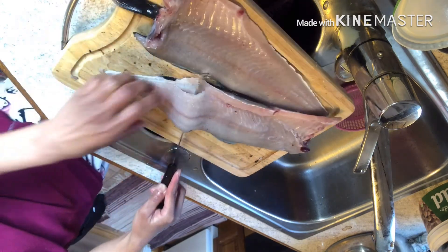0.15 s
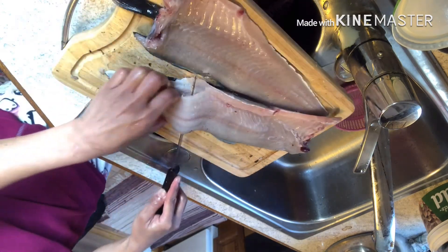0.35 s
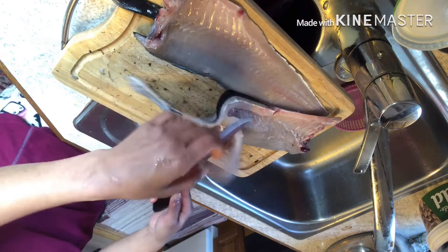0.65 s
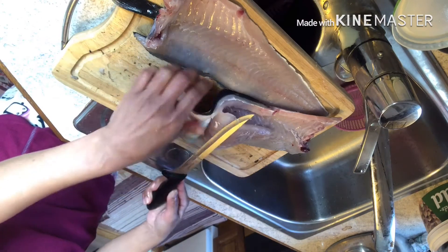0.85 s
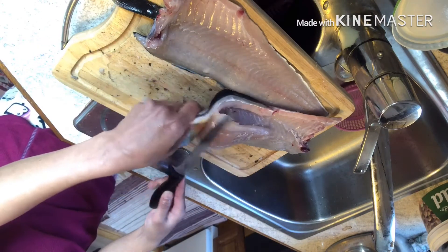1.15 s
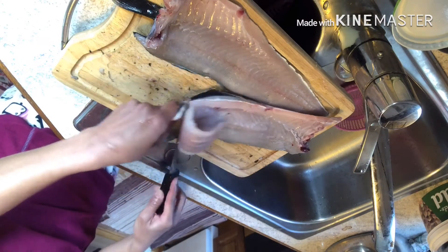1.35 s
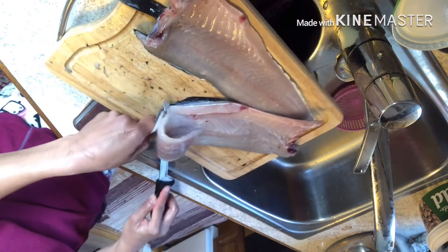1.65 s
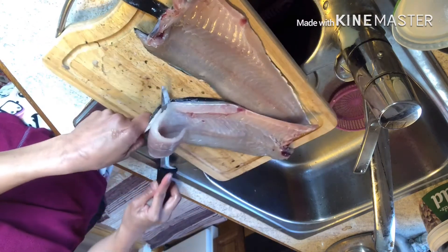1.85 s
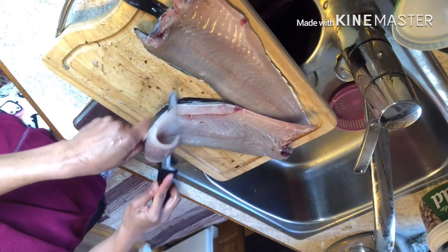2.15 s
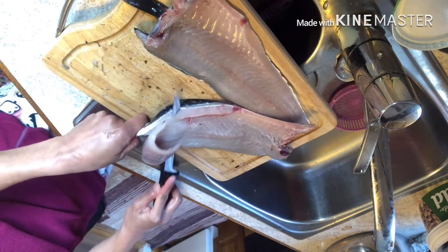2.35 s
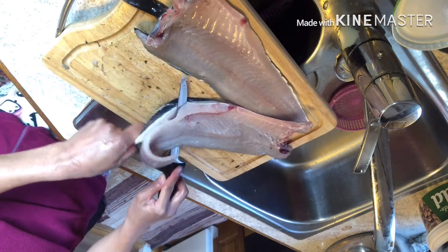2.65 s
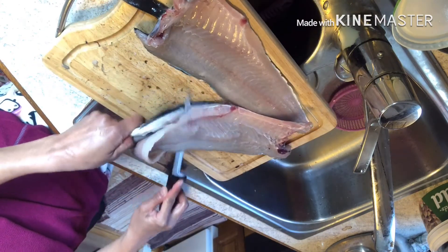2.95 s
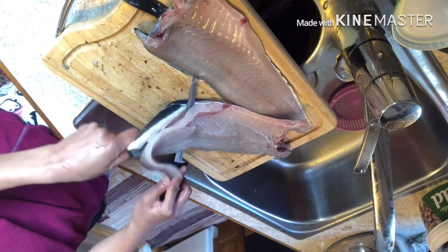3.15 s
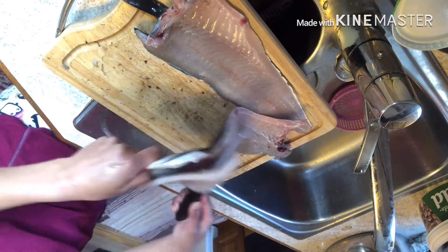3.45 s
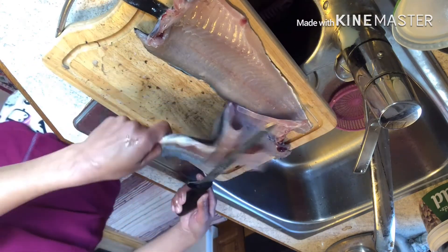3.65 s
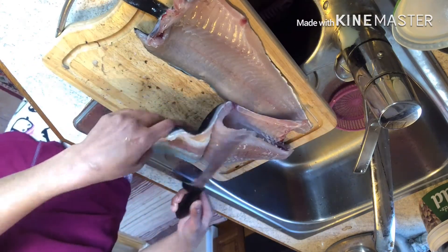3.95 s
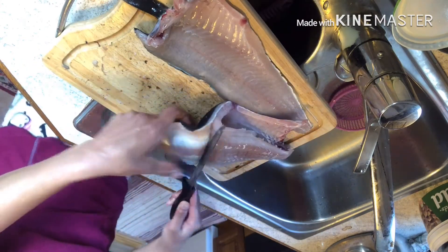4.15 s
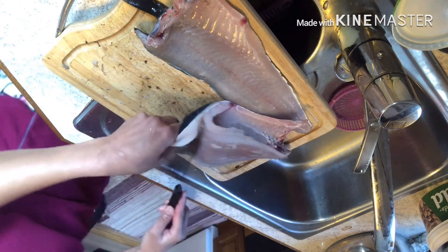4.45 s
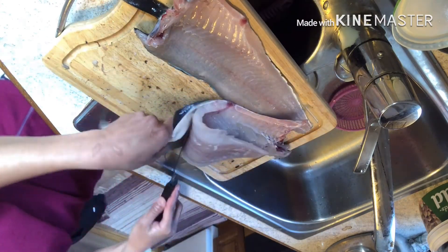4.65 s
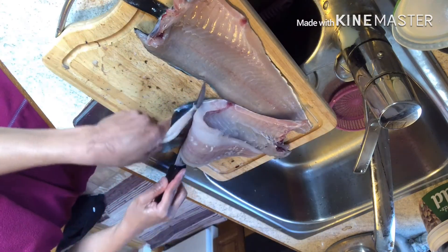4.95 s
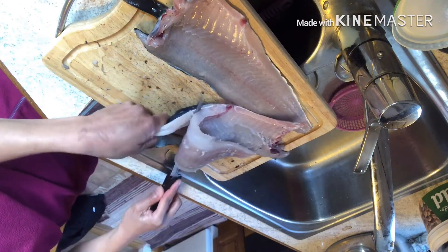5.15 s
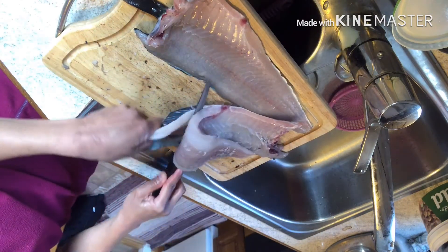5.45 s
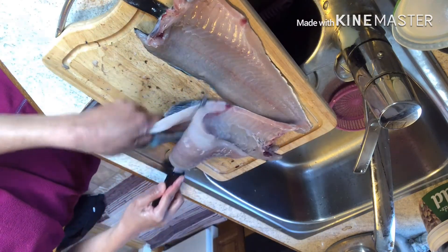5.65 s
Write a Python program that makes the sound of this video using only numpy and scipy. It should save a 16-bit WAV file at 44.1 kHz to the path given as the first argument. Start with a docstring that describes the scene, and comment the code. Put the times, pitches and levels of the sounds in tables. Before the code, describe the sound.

A knife rasps between skin and flesh of a raw fish fillet on a wooden board, with wet smacks, sharp snaps and hollow knocks.

```python
"""A raw fish fillet is skinned on a wooden board across a steel kitchen sink, in a small, quiet kitchen.
At first the knife rasps softly to and fro; near one second the blade judders briefly on the wood.
Then the strokes grow louder, and where the blade catches it snaps free and the board knocks.
After a calmer spell past three seconds, the strongest snaps and rasps come near the end.
Filtered noise makes rasp, hiss and snaps, fading sine tones make the board ring; wet smacks run throughout."""
import sys
import numpy as np
from scipy import signal
from scipy.fft import rfft, irfft
from scipy.io import wavfile

SR = 44100
rng = np.random.default_rng(int(sys.argv[2]) if len(sys.argv) > 2 else 0)


def to_wav(s):
    """Save 16-bit WAV."""
    ch = np.atleast_2d(s).T  # columns
    pcm = np.round(np.clip(ch, -1, 1) * 32767)  # PCM
    wavfile.write(sys.argv[1], SR, pcm.astype(np.int16))


N = 255339   # length of the scene in samples
TIME = np.arange(N) / SR   # seconds since the scene began
AGE = np.arange(SR // 2) / SR   # seconds since one short sound began


def from_db(db):
    """Turn decibels into gain."""
    return 10 ** (np.asarray(db) / 20)


def rms_one(x, size=None):
    """Scale to an rms of 1, judged on the first `size` samples or on all."""
    return x / np.sqrt(np.mean(x[:size] ** 2) + 1e-20)


def add(out, start_s, sound):
    """Mix a sound in at a time, cut off where the scene ends."""
    start = max(0, round(start_s * SR))
    out[start:start + len(sound)] += sound[:max(0, N - start)]


def at_hz(points, hz):
    """Read a spectrum between its points, on a log-frequency axis."""
    freq, db = np.transpose(points)
    return np.interp(np.log(hz + 1e-6), np.log(freq), db)


def coloured(x, *spectra, peaks=()):
    """Shape a steady noise by spectra and resonance peaks, then scale to an rms of 1."""
    hz = np.fft.rfftfreq(len(x), 1 / SR)
    db = sum(at_hz(points, hz) for points in spectra)
    for centre_hz, width_hz, lift_db in peaks:
        db = db + lift_db / (1 + (2 * (hz - centre_hz) / width_hz) ** 2)
    return rms_one(irfft(rfft(x) * from_db(db), len(x)))


def resonate(x, hz, width_hz):
    """Ring one resonance, a two-pole filter with gain 1 at its peak."""
    r = np.exp(-np.pi * width_hz / SR)
    feedback = [1, -2 * r * np.cos(2 * np.pi * hz / SR), r * r]
    return (1 - r * r) / 2 * signal.lfilter([1, 0, -1], feedback, x)


def drift(rate):
    """Wander slowly at random: normal values of spread 1, `rate` per second, joined by lines."""
    knots = rng.standard_normal(4096)
    return np.interp(TIME * rate, np.arange(len(knots)), knots)


def grains(per_s, spread_db):
    """Scatter tiny random contacts of very unequal size; rms 1."""
    size_db = spread_db * np.minimum(rng.exponential(1, N), 5)
    sizes = from_db(size_db) * rng.choice([-1, 1], N)
    return rms_one(sizes * (rng.random(N) < per_s / SR))


# colour of the quiet background: pitch_hz, relative level_db
ROOM_TONE_COLOUR = [(15, -41), (25, -8), (137, -2.5), (439, -7.5), (575, -7.5), (641, -8), (887, -12.5),
                    (962, -12), (1610, -15), (1940, -17.5), (3820, -18.5), (10100, -24), (14800, -24.5),
                    (16000, -22.5)]
ROOM_TONE_DB = -64.5


def room_tone():
    """Steady coloured noise stands for the quiet kitchen."""
    return from_db(ROOM_TONE_DB) * coloured(rng.standard_normal(N), ROOM_TONE_COLOUR)


def kitchen(x, gap_s, low_t60_s, treble_t60_s):
    """Near walls send back a blur of reflections, made of fading noise; the treble dies sooner."""
    noise = rng.standard_normal(len(AGE))
    low = signal.sosfilt(signal.butter(1, 4000, fs=SR, output="sos"), noise)
    treble = noise - low
    echo = low * from_db(-60 * AGE / low_t60_s) + treble * from_db(-60 * AGE / treble_t60_s)
    echo *= 1 - np.exp(-(AGE / gap_s) ** 2)   # the reflections arrive a little late
    return signal.fftconvolve(x, echo / np.sqrt(np.sum(echo ** 2)))[:N]


# the blade sticks and slips on the wood:
# start_s, length_s, relative level_db, brightness_db_per_octave
JUDDERS = [(0.9955, 0.04, -46, 3.5), (1.017, 0.041, -41, -12), (1.088, 0.051, -49.5, 0),
           (1.117, 0.024, -52.5, 3.0)]
# resonances that a judder sets singing: pitch_hz, width_hz, relative level_db
SINGING_RESONANCES = [(476, 2.7, -3), (654, 180, -12), (1272, 17, -17), (1624, 44, -10.5), (2650, 350, -24),
                      (3480, 320, -24)]


def judders(level_db):
    """Irregular slips, made of noise, swell and fade in a few resonances."""
    out = np.zeros(N)
    lowest_hz = SINGING_RESONANCES[0][0]
    for start_s, length_s, db, brightness in JUDDERS:
        swell = np.sin(np.pi * np.minimum(AGE / length_s, 1) ** 0.82)
        for hz, width_hz, line_db in SINGING_RESONANCES:
            slips = rng.standard_normal(2 * len(AGE))
            tone = resonate(slips, hz, width_hz)[len(AGE):]   # skip the filter's build-up
            gain = from_db(db + level_db + line_db + brightness * np.log2(hz / lowest_hz))
            add(out, start_s, gain * rms_one(tone * swell, size=int(length_s * SR)))
    return out


# blows on the board: start_s, relative level_db, depth_db (up to 140 Hz),
# hardness_db (440 to 530 Hz), edge_db (from 1120 Hz up)
KNOCKS = [(0.83, -66.5, 7.5, 6, -1), (1.849, -53.5, -4, 3, -35), (2.077, -49.5, -7, -6, -32),
          (2.207, -45, -8, -11, -30), (2.244, -60, -14, 9.5, -6), (2.267, -50, -9, 8.5, -14),
          (2.304, -53, 1, 4, 6), (2.62, -42.5, -5.5, -1.5, 3.5), (2.656, -36, -12, 0.5, -4),
          (2.699, -45, 0, 3.5, 6), (3.08, -46.5, -2, 4.5, 10), (3.108, -50, 7, 13.5, 5),
          (3.137, -53, 9, 15, 10), (3.169, -54.5, 0, 13.5, 16), (3.721, -63.5, 3, -1, 5),
          (3.806, -52, 5.5, 3, 8), (3.991, -53.5, -0.5, 0.5, -15), (4.243, -68, 15.5, 5, 14),
          (4.497, -44, -8.5, 4, -46), (4.714, -65, 5, -14, 4), (5.389, -36, -5.5, 4, -2.5),
          (5.455, -40, -1, 8.5, -2), (5.562, -36, -8.5, -10.5, -9.5), (5.75, -36, -11.5, 4, -8)]
# ways the board rings on the sink: pitch_hz, relative level_db, t60_s (time to fade by 60 dB)
BOARD_MODES = [(69, -14, 0.43), (104.6, -5, 0.41), (136.2, 6, 0.26), (205.3, -9, 0.4), (232.4, 11, 0.093),
               (276.5, 4, 0.16), (310, 2, 0.12), (381, -2, 0.092), (452.6, 8, 0.13), (487, -5, 0.15),
               (646, -5, 0.23), (686.3, -4, 0.15), (759, -8, 0.16), (1055, -16.5, 0.25), (1278, 1.5, 0.051),
               (1561, 8, 0.039), (1670, -7, 0.085), (1840, -19, 0.078), (2210, -14, 0.15),
               (2380, -28, 0.024), (3000, -18, 0.1)]
# colour of the dull thud of sink and counter: pitch_hz, relative level_db
THUD_COLOUR = [(35, -31), (70, 8.5), (130, 8), (240, 10.5), (430, 3), (560, -26), (720, 7), (950, -17),
               (1450, -13), (2200, -45), (4000, -31), (9000, -40)]


def knocks(modes_db, thud_db, thud_s, cushion_s, build_cycles):
    """A blow, cushioned by the fillet, rings the board's modes over a dull thud of sink and counter."""
    out = np.zeros(N)
    hz, mode_db, t60_s = np.transpose(BOARD_MODES)[:, :, None]
    push = 1 - np.exp(-(AGE / cushion_s) ** 2)
    build = 1 - np.exp(-(AGE * hz / build_cycles) ** 2)   # low modes take longer to get going
    for start_s, db, depth, hardness, edge in KNOCKS:
        contact = [(140, depth), (210, 0.004), (330, 0), (440, hardness), (530, hardness), (1120, edge)]
        phase = rng.uniform(0, 2 * np.pi, hz.shape)   # each blow lands on another spot
        fading = from_db(mode_db + at_hz(contact, hz) - 60 * AGE / t60_s)
        modes = build * fading * np.sin(2 * np.pi * hz * AGE + phase)
        strength = np.sqrt(np.mean(modes ** 2, axis=1).sum())   # from the energy of all modes
        ring = rms_one(push * modes.sum(axis=0))
        thud_noise = coloured(rng.standard_normal(len(AGE)), THUD_COLOUR, contact)
        thud = rms_one(push * thud_noise * np.exp(-AGE / thud_s))
        blow = from_db(modes_db) * ring + from_db(thud_db) * thud
        add(out, start_s - .001, from_db(db) * strength * blow)   # starts 1 ms before its table time
    return out


# resonances of the blade: pitch_hz, width_hz, lift_db
BLADE_RESONANCES = [(1536, 83, 8.5), (1847, 43, 6.5), (2456, 55, 7.5), (3100, 140, 6), (3516, 140, 1.5),
                    (3630, 140, 5), (4980, 480, 5.5), (5530, 97, 1.5), (6230, 510, 0.5), (6120, 65, 2.5),
                    (7790, 210, 5), (8300, 280, -3.5), (11400, 160, 9), (15000, 460, 10.5)]


def on_blade(x, colour):
    """Colour a noise and let the blade's resonances stand out of it."""
    return coloured(x, colour, peaks=BLADE_RESONANCES)


# wet skin peels off with a small bright smack: start_s, relative level_db
SMACKS = [(0.334, -60), (0.597, -46.5), (0.662, -48), (0.686, -52), (0.6935, -46), (1.078, -54.5),
          (1.117, -48), (1.293, -58), (1.978, -51), (3.309, -45), (3.447, -42), (3.678, -54),
          (4.459, -59.5), (4.493, -48.5), (4.516, -45.5), (4.668, -57), (5.294, -51), (5.354, -39)]


def smacks():
    """Wet smacks are snaps that share one thin, bright colour and a quick start."""
    bite_db, sparkle_db, rise_s = -8.5, 6.5, 0.00047
    return [(start_s, db, bite_db, sparkle_db, rise_s) for start_s, db in SMACKS]


# the caught blade snaps free: start_s, relative level_db, bite_db (near 2.5 kHz),
# sparkle_db (near 13 kHz), rise_s
SNAPS = [(0.8267, -41, -4.5, -2, 0.0052), (1.741, -49.5, 14, -6, 0.0003), (1.841, -33, 1.5, 2, 0.00091),
         (2.2005, -39, 16, 7, 0.002), (2.2405, -27.5, 1, 5.5, 0.00066), (2.264, -29, -1, 0.5, 0.00068),
         (2.301, -33.5, 1, 2, 0.0003), (2.6184, -35.5, 4.5, 3.5, 0.00063), (2.654, -30, 5, 1, 0.00058),
         (2.697, -25.5, 8.5, 8, 0.00019), (2.76, -45, 38, -8, 0.0002), (3.075, -32.5, 0.5, -7, 0.0022),
         (3.105, -28.5, 1.5, 0, 0.00046), (3.136, -33.5, 3, -12, 0.00086), (3.168, -34, -1, 5, 0.0012),
         (3.179, -33.5, 7, -8, 0.00016), (3.751, -42.5, -3, 6, 0.0012), (3.7724, -42.5, -11, -4, 0.003),
         (3.8053, -31.5, 8.5, 1, 0.0013), (4.712, -40.5, 24, -28, 0.00044),
         (5.063, -42.5, 13, -20, 0.00045), (5.08, -43, -3, -20, 0.0003), (5.102, -41, 11, -17, 0.00092),
         (5.2125, -38.5, 17, -17, 0.00027), (5.385, -23.5, 3.5, 2.5, 0.00049),
         (5.426, -26.5, 3, -5, 0.00019), (5.556, -38, 38, 2, 0.0016), (5.783, -23.5, 2.5, -15, 0.0021)]


def snaps(level_db, spike_db, crack_s, ring_s, ring_db):
    """Each snap or smack is noise fading as a spike, a crack of a few milliseconds and a short ring."""
    out = np.zeros(N)
    spike = from_db(spike_db) * np.exp(-AGE / 0.00033)
    decay = spike + np.exp(-AGE / crack_s) + from_db(ring_db) * np.exp(-AGE / ring_s)
    for start_s, db, bite, sparkle, rise_s in list(SNAPS) + smacks():
        colour = [(300, bite - 24), (1100, bite - 13), (2100, bite), (3200, bite), (5800, 1),
                  (8500, -0.3), (12500, sparkle), (15800, sparkle + 1), (18000, sparkle - 20)]
        crack = on_blade(rng.standard_normal(len(AGE)), colour) * decay
        crack *= 1 - np.exp(-(AGE / rise_s) ** 2)
        add(out, start_s, from_db(db + level_db) * rms_one(crack, size=220))   # judged on 5 ms
    return out


def squelch(x, wander_db):
    """Wet flesh shifts on the steel, so each region of the treble swells and sinks on its own."""
    out = x.copy()
    for hz in np.geomspace(1500, 15000, 13):
        out += (from_db(wander_db * drift(rate=32)) - 1) * resonate(x, hz, 0.21 * hz)
    return out


def stroke_gate(start_s, length_s):
    """A stroke sets in, holds for its length and dies away."""
    attack_s, release_s = 0.019, 0.028
    age = np.maximum(TIME - start_s, 0)
    attack = 1 - np.exp(-np.minimum(age / attack_s, 6) ** 2)
    return attack * np.exp(-np.clip((age - length_s) / release_s, 0, 20))


# strokes of knife and hand; each bends the blade anew, so that another resonance speaks:
# start_s, length_s, relative rasp_db, hiss_db and rumble_db, swell_db (from start to end),
# ring_hz, ring_lift_db, overtone_lift_db
STROKES = [(0.064, 0.11, -67.5, -81, -69, -13, 1560, 5, 4),
           (0.486, 0.14, -70.5, -64, -72.5, 17.5, 1410, 22, -2),
           (0.637, 0.06, -68.5, -57.5, -69, 2, 1544, 16.5, -6),
           (0.785, 0.12, -74, -65.5, -71, -6, 1600, 1, -10), (0.99, 0.08, -73, -87, -56.5, -4, 1600, 2, -6),
           (1.082, 0.12, -73, -67, -65, 6.5, 1650, 13, 2), (1.348, 0.25, -68.5, -75, -79, 6, 1510, 13, 4),
           (1.547, 0.27, -58.5, -68, -49, 6.5, 3250, 1, 4.5),
           (1.798, 0.12, -51, -57, -51.5, -13, 2750, 6, 2), (1.964, 0.094, -60, -61, -60, 16.5, 2650, 6, 7),
           (2.142, 0.072, -55.5, -54, -58, 20, 2340, 16.5, 2),
           (2.216, 0.11, -55, -52.5, -49.5, -15, 2150, 8.5, -1.5),
           (2.338, 0.16, -56.5, -63, -57, 8.5, 2290, 12, 8),
           (2.56, 0.14, -55, -54.5, -51, 15, 2060, 13, 11.5),
           (2.793, 0.2, -55.5, -58, -55.5, -4.5, 1910, 15.5, 6),
           (3.023, 0.15, -51, -53, -56, 6, 1870, 4.5, 8.5), (3.25, 0.26, -65.5, -58, -66, 7.5, 1430, 14, 0),
           (3.558, 0.22, -67.5, -71.5, -71, 2, 3330, 1.5, 7),
           (3.79, 0.083, -62.5, -63, -66, -4, 3240, 7.5, -5), (3.952, 0.19, -74, -83, -64, 1, 2220, 11, 0),
           (4.156, 0.064, -63, -73, -58, -2, 1980, 8.5, 2),
           (4.227, 0.1, -58, -82, -54, -23, 2300, 11.5, -10),
           (4.4, 0.77, -68.5, -68, -69.5, 3.5, 2070, 9, 8), (4.82, 0.19, -56, -56, -60, 6.5, 1860, 1, 6.5),
           (5.044, 0.16, -51, -54, -58, 13, 1840, 4, 7.5), (5.271, 0.12, -57, -59, -74, 4, 1850, 0, 8),
           (5.334, 0.12, -45, -48, -48, -1.5, 1530, 6, -2),
           (5.495, 0.12, -49, -53, -52.5, 6.5, 1890, 2, 10.5),
           (5.598, 0.094, -52.5, -45.5, -64, 5, 3170, 3, 12),
           (5.726, 0.073, -48, -49.5, -47, 6, 3230, -6, -7)]


def bent_blade(x, share):
    """Lift each stroke's ring and overtone while it lasts, by a share of their full decibels."""
    out = x.copy()
    for start_s, length_s, *_, ring_hz, ring_db, overtone_db in STROKES:
        held = x * stroke_gate(start_s, length_s) + 1e-18
        overtone_hz = 3.01 * ring_hz   # second bending mode of the blade
        out += (from_db(share * ring_db) - 1) * resonate(held, ring_hz, 0.13 * ring_hz)
        out += (from_db(share * overtone_db) - 1) * resonate(held, overtone_hz, 0.11 * overtone_hz)
    return out


def stroke_gains():
    """Rasp, hiss and rumble follow speed, which arches, and pressure, which grows or eases in a stroke."""
    arch_db = 3.5   # the blade runs fastest in the middle of a stroke
    power = np.zeros((3, N))
    for start_s, length_s, rasp_db, hiss_db, rumble_db, swell_db, *_ in STROKES:
        progress = np.clip((TIME - start_s) / length_s, 0, 1) - .5   # from -0.5 to 0.5
        arch = np.cos(np.pi * progress) - 2 / np.pi
        effort = from_db(swell_db * progress + arch_db * arch)
        levels = from_db([[rasp_db], [hiss_db], [rumble_db]])
        power += levels ** 2 * (stroke_gate(start_s, length_s) * effort) ** 2
    return np.sqrt(power)


# colour of fibres tearing on the blade: pitch_hz, relative level_db
RASP_COLOUR = [(500, -34), (950, -15.5), (1350, -7), (2100, -1), (3400, 0), (4350, -4), (5000, -5),
               (5900, -5), (6500, -13.5), (7500, -5.5), (10000, -47), (16000, -32)]
# colour of the wet film, all treble: pitch_hz, relative level_db
WET_HISS_COLOUR = [(3000, -10.5), (6000, -1), (8000, 1), (10500, 1), (12500, 1), (14500, 5), (16000, -6)]
# colour of the shaken board: pitch_hz, relative level_db
RUMBLE_COLOUR = [(40, -51), (90, -11), (140, -2), (235, 6), (310, 2.5), (405, -3), (460, 9.5), (540, -10),
                 (700, -2), (900, -18), (1400, -14), (3000, -40)]


def sawing(rasp_db, hiss_db, crackle_db, rumble_db, flutter_db):
    """Tearing fibres rasp on the blade, the wet film fizzes and crackles, and the drag shakes the board."""
    flutter = from_db(flutter_db * drift(rate=140))   # the edge never runs evenly
    rasping, wetness, drag = stroke_gains() * flutter
    fibres = grains(per_s=8300, spread_db=3.5)
    fizz = grains(per_s=12000, spread_db=3.5)
    crackle = from_db(crackle_db) * grains(per_s=170, spread_db=7.0)
    rasp = from_db(rasp_db) * rasping * on_blade(fibres, RASP_COLOUR)
    hiss = from_db(hiss_db) * wetness * coloured(fizz + crackle, WET_HISS_COLOUR)
    rumble = from_db(rumble_db) * drag * coloured(rng.standard_normal(N), RUMBLE_COLOUR)
    return squelch(bent_blade(rasp + hiss, share=0.81), wander_db=3.0) + rumble


def scene():
    """Knife, fillet and board sound close by, in a quiet kitchen that answers."""
    rubbing = sawing(rasp_db=-2.1, hiss_db=-1.07, crackle_db=-5.5, rumble_db=-1.67, flutter_db=2.44)
    rubbing += judders(level_db=-4.0)
    cracks = snaps(level_db=-3.5, spike_db=18.0, crack_s=0.0032, ring_s=0.0053, ring_db=-5.5)
    cracks = squelch(bent_blade(cracks, share=0.93), wander_db=3.5)
    blows = cracks + knocks(modes_db=1.0, thud_db=-6.5, thud_s=0.022, cushion_s=0.0012, build_cycles=1.0)
    into_room = from_db(-14.0) * blows + from_db(-10.5) * rubbing
    echoes = kitchen(into_room, gap_s=0.0058, low_t60_s=0.26, treble_t60_s=0.072)
    return (rubbing + blows + echoes + room_tone())[None]


def record(dry):
    """The microphone drops the bass below 42 Hz, and the top is cut above 16.1 kHz."""
    thin = signal.sosfilt(signal.butter(3, 42, "high", fs=SR, output="sos"), dry)
    return signal.sosfilt(signal.ellip(10, .2, 70, 16100, fs=SR, output="sos"), thin)


dry = scene()
out = record(dry)
to_wav(out)
```